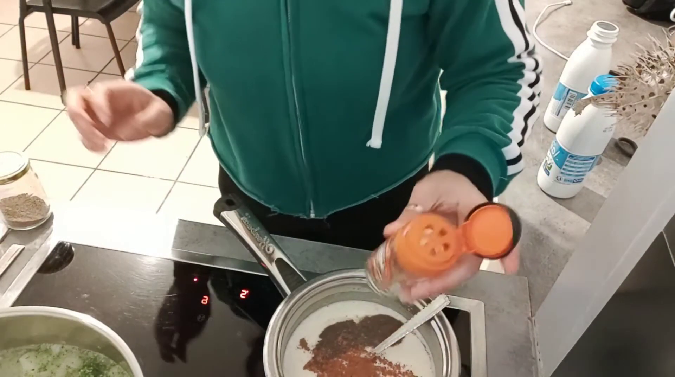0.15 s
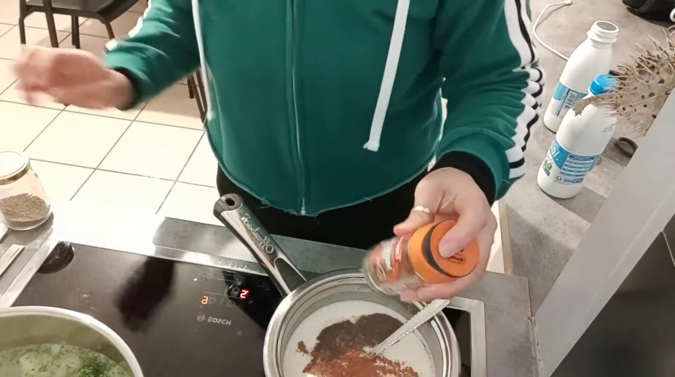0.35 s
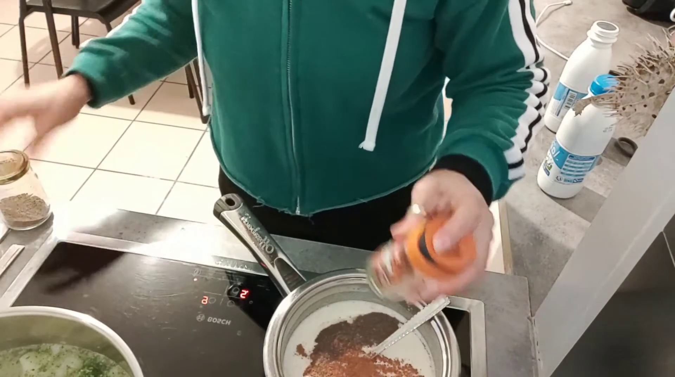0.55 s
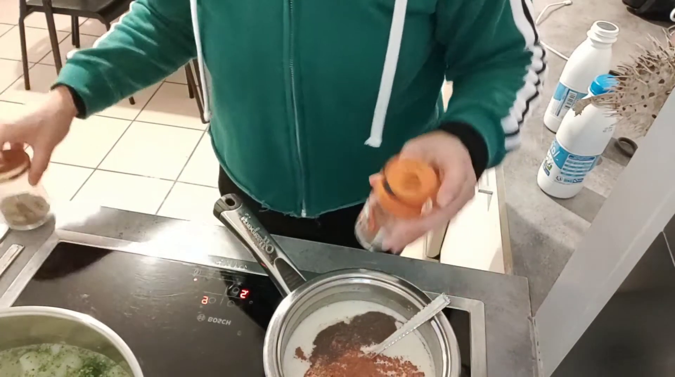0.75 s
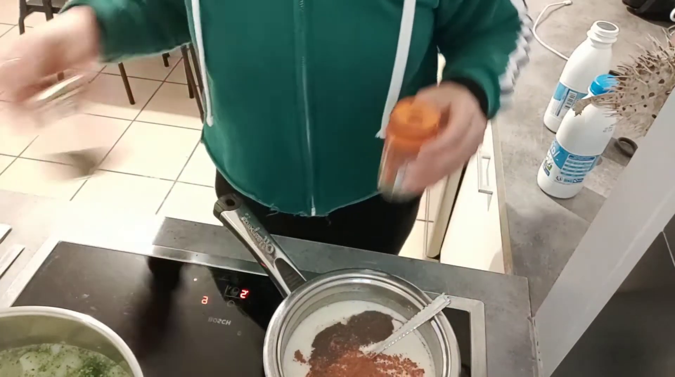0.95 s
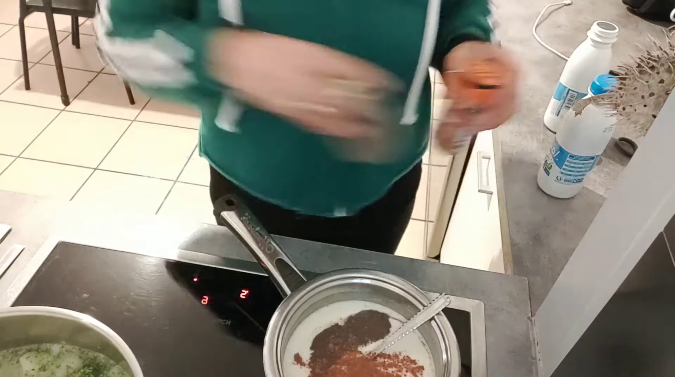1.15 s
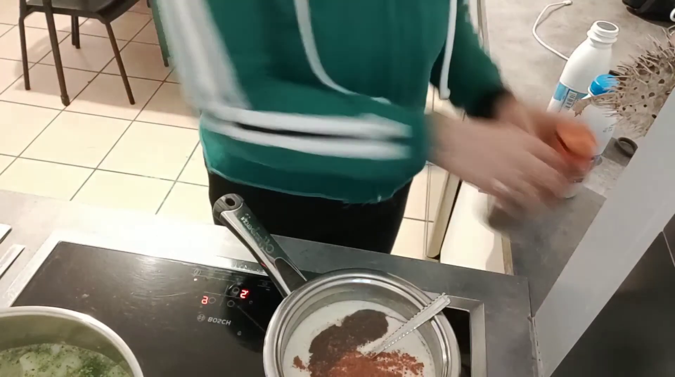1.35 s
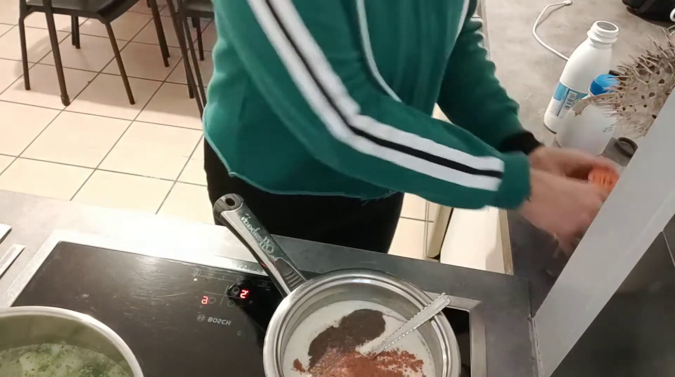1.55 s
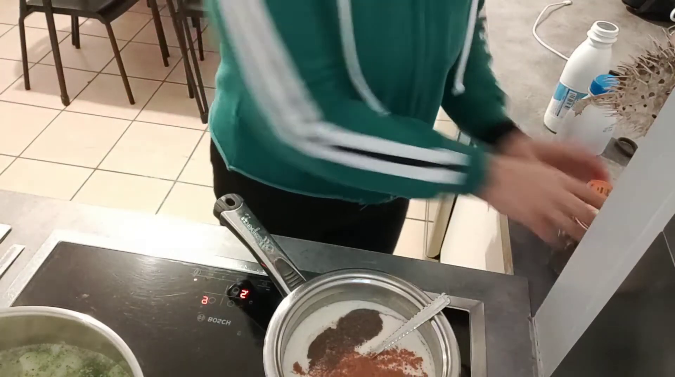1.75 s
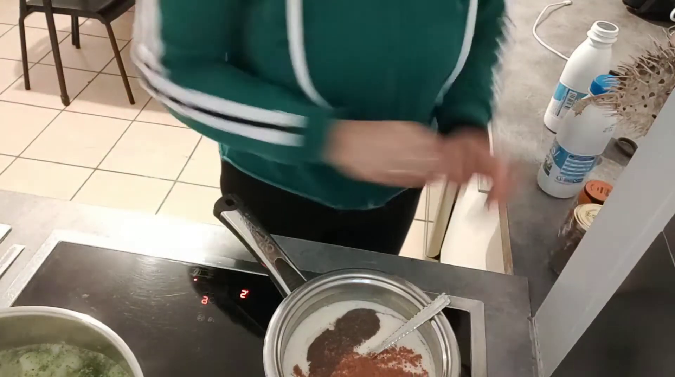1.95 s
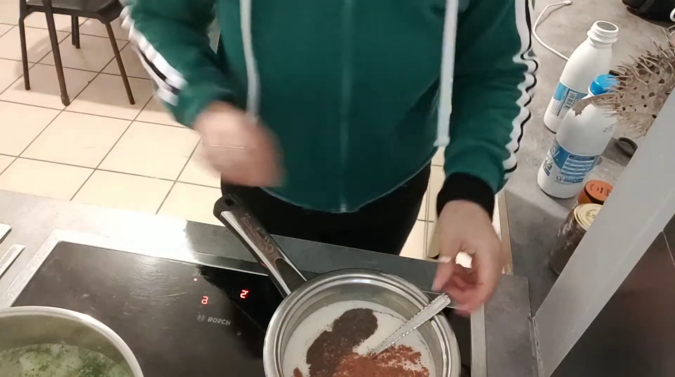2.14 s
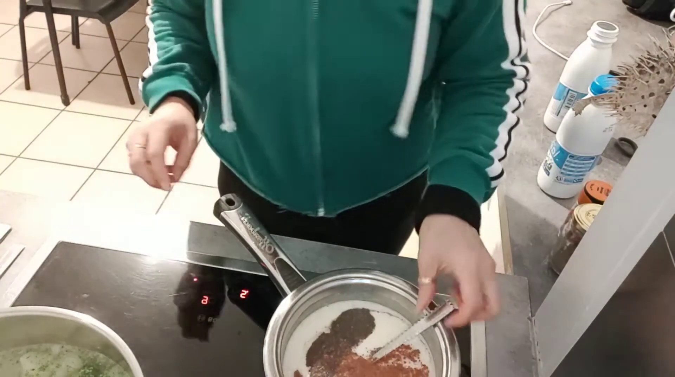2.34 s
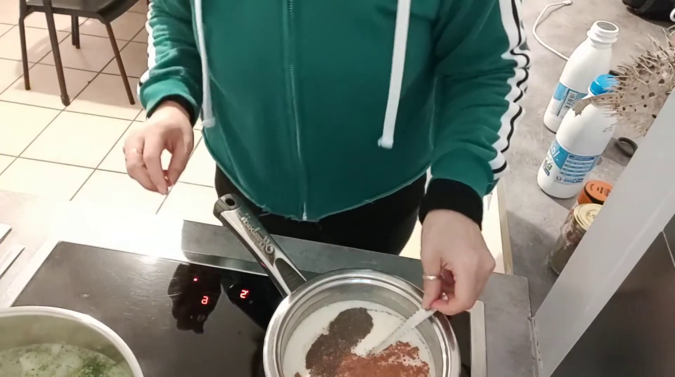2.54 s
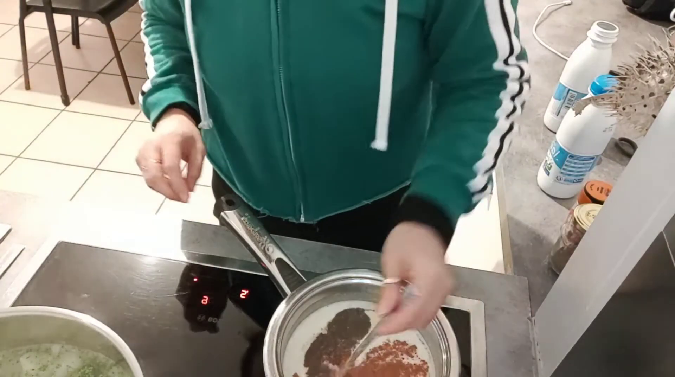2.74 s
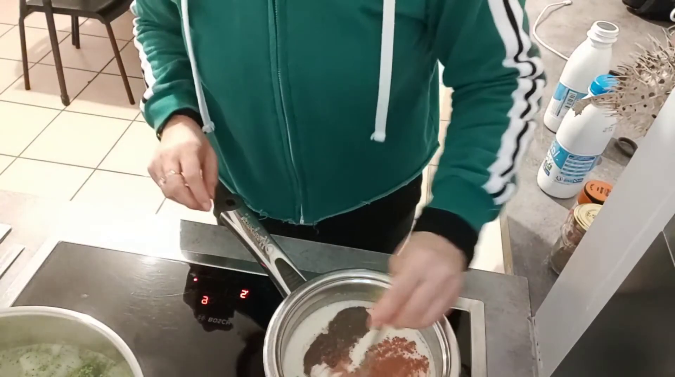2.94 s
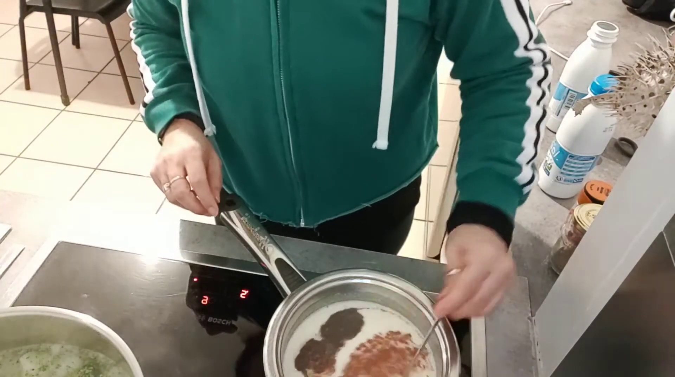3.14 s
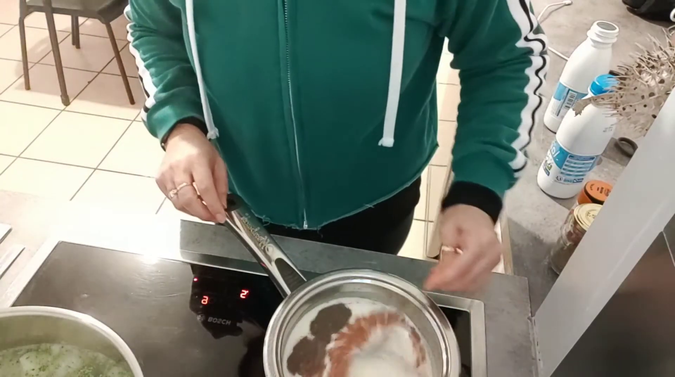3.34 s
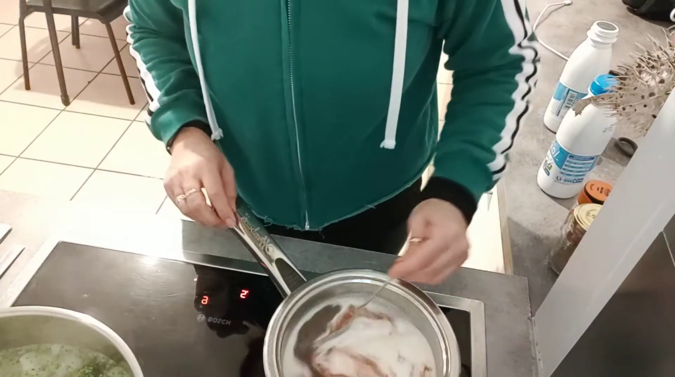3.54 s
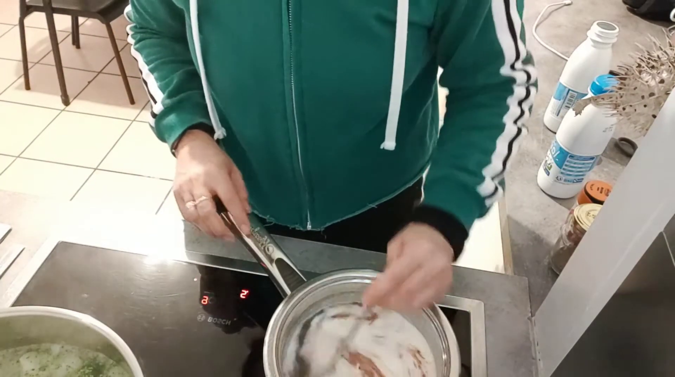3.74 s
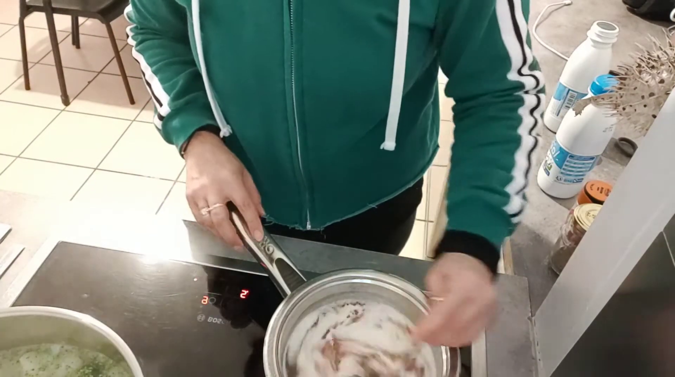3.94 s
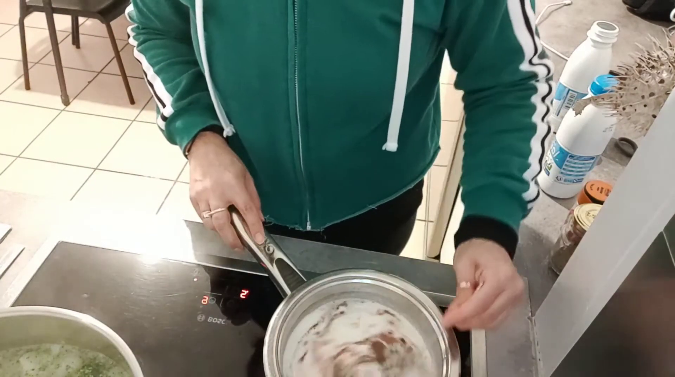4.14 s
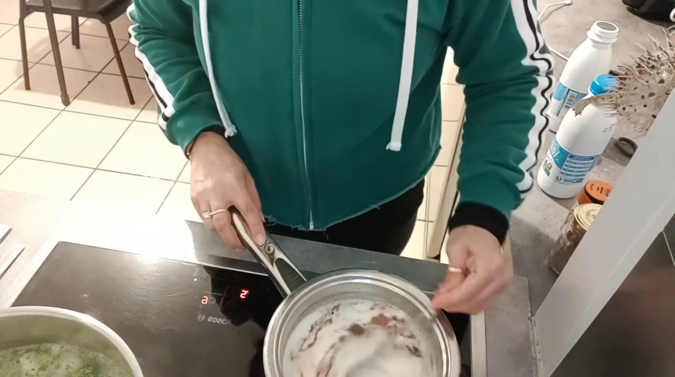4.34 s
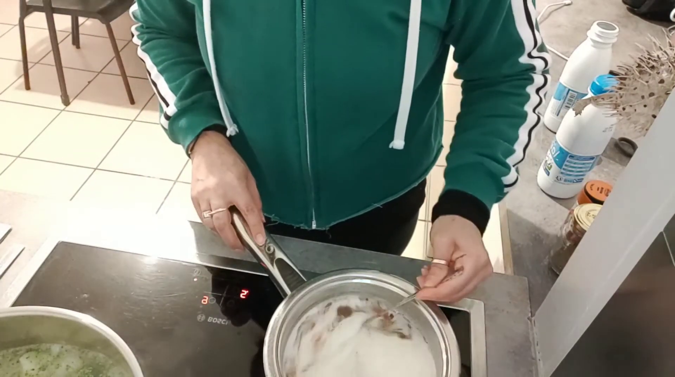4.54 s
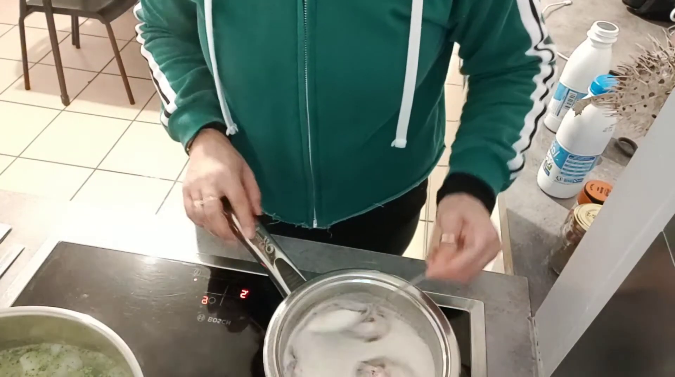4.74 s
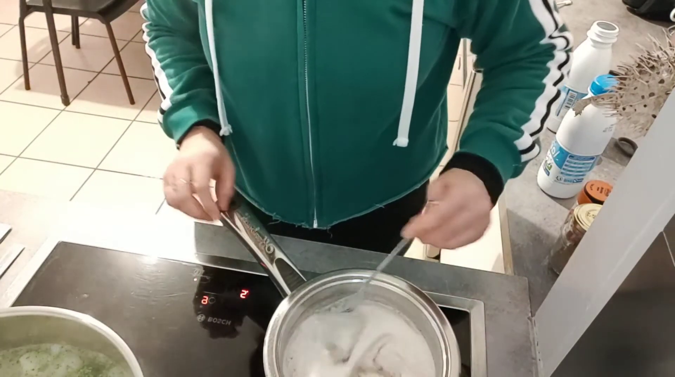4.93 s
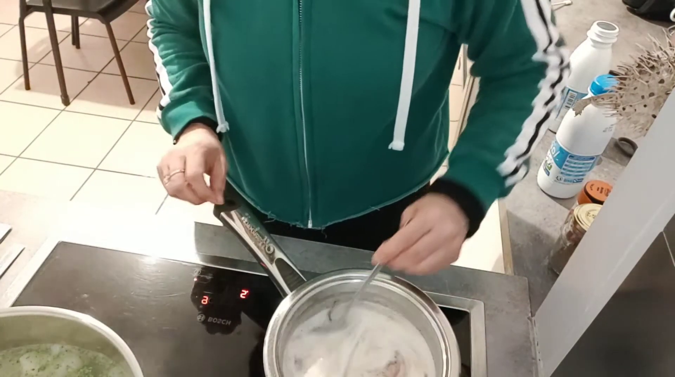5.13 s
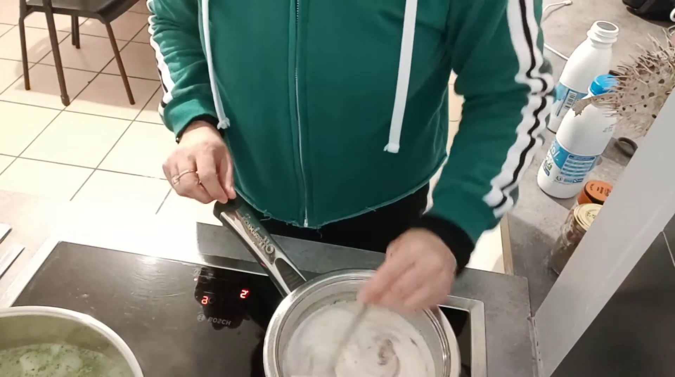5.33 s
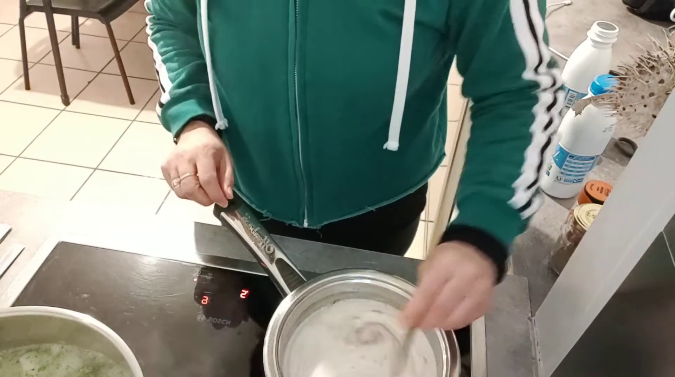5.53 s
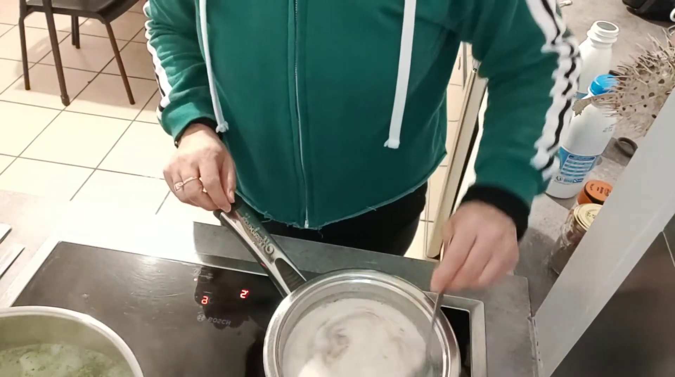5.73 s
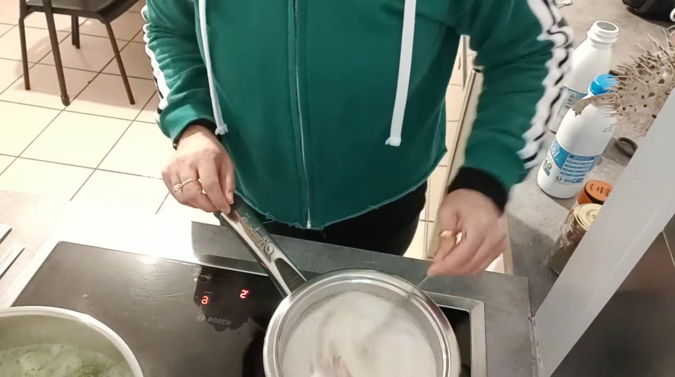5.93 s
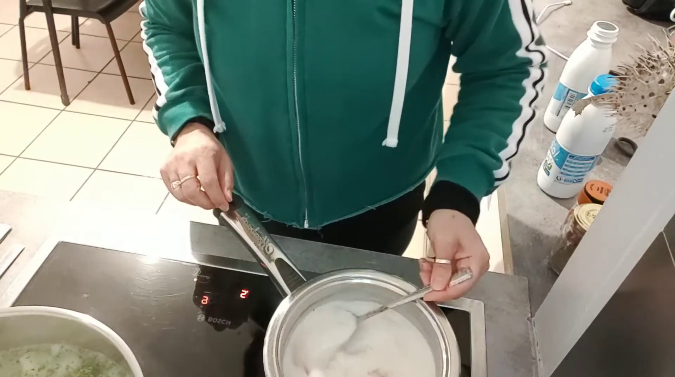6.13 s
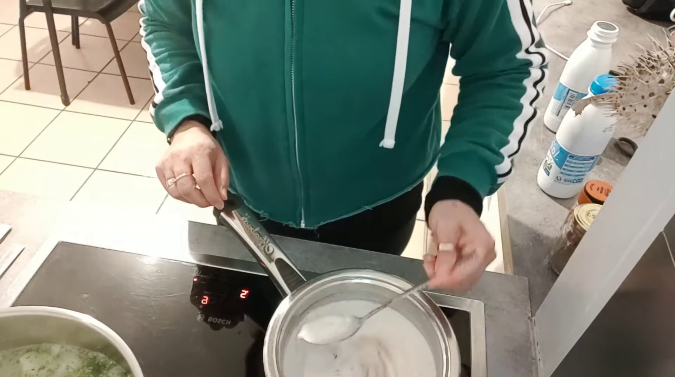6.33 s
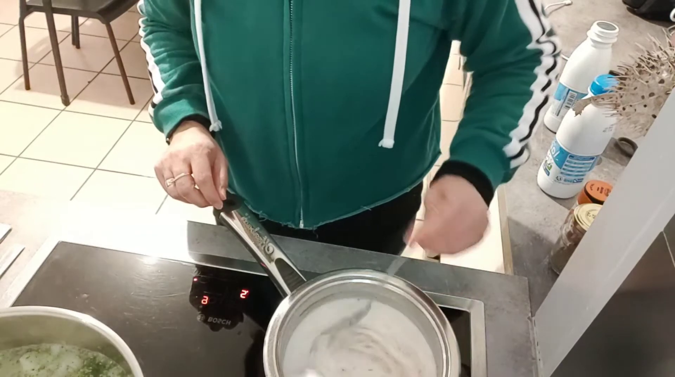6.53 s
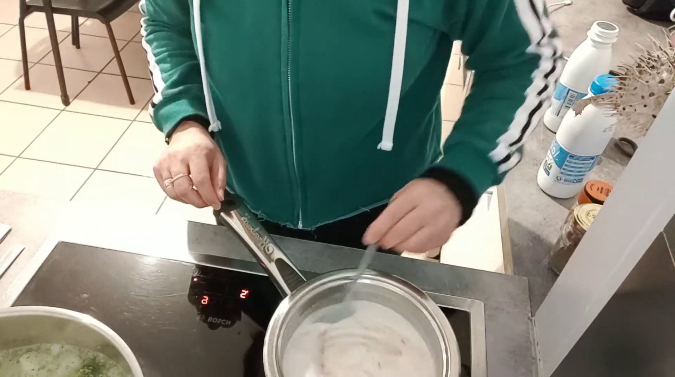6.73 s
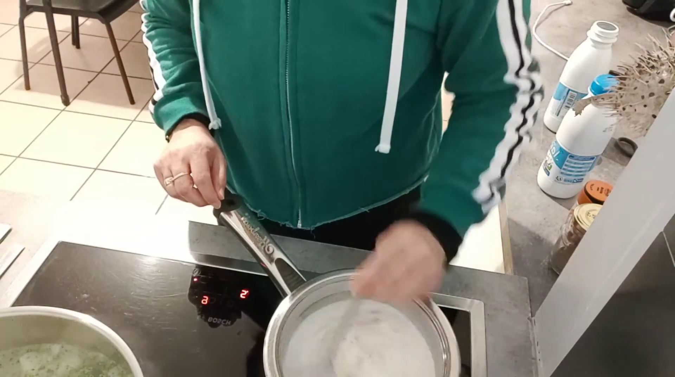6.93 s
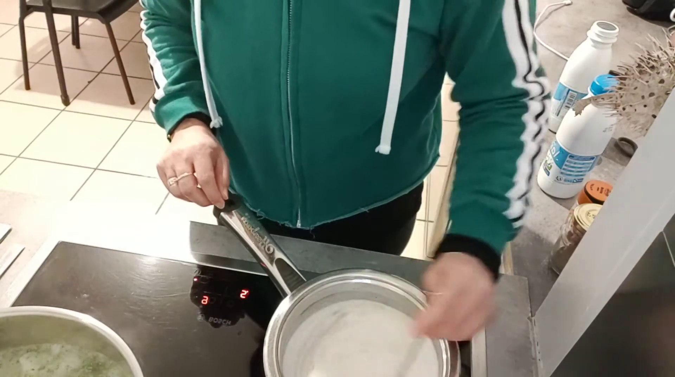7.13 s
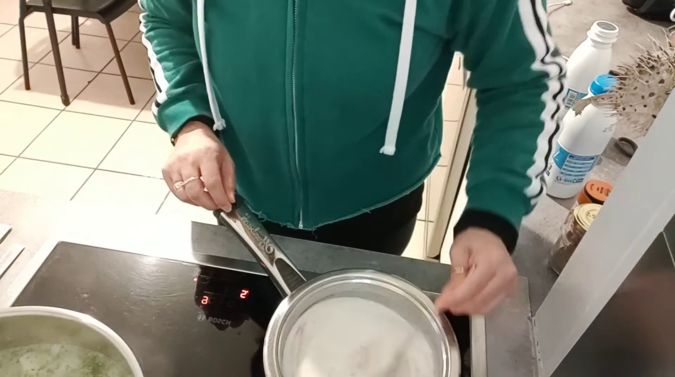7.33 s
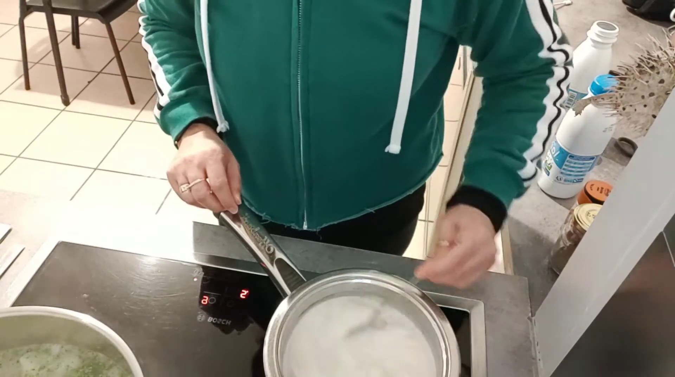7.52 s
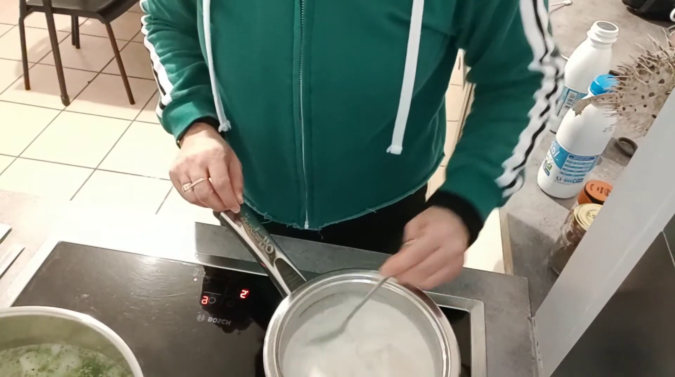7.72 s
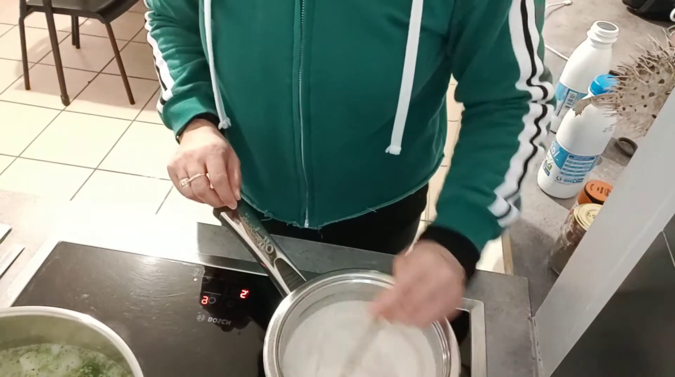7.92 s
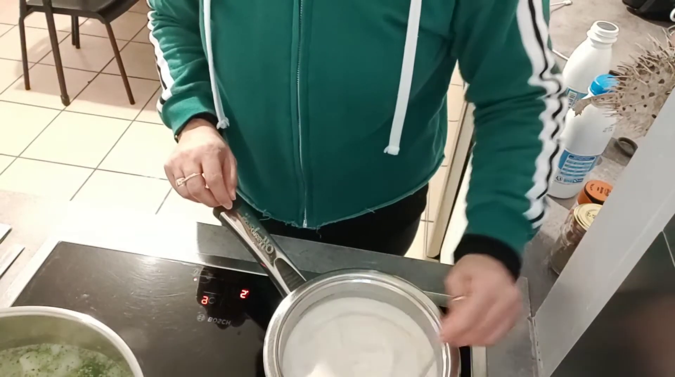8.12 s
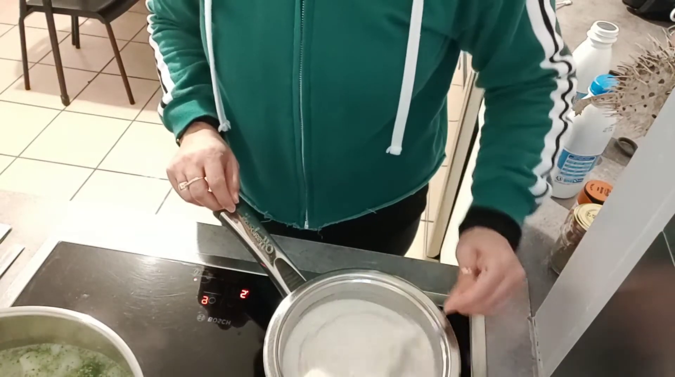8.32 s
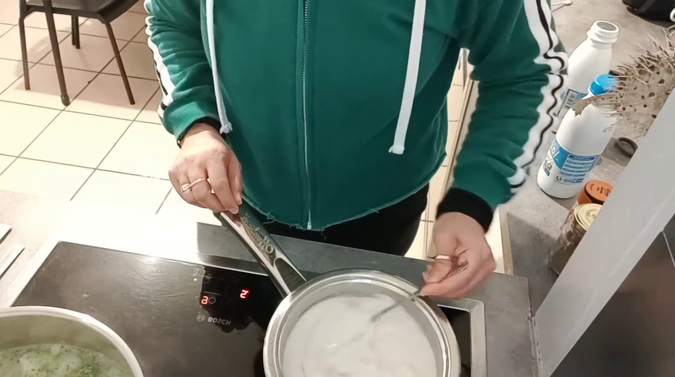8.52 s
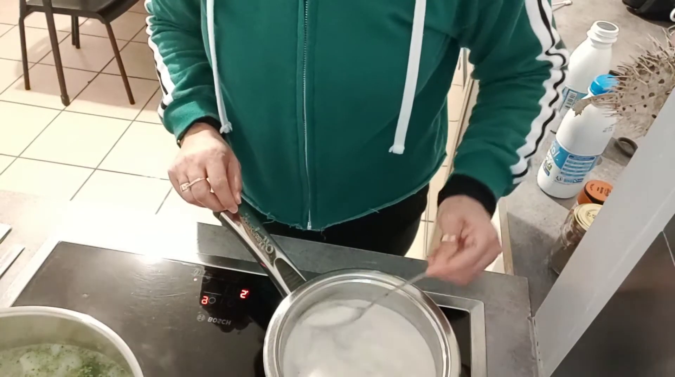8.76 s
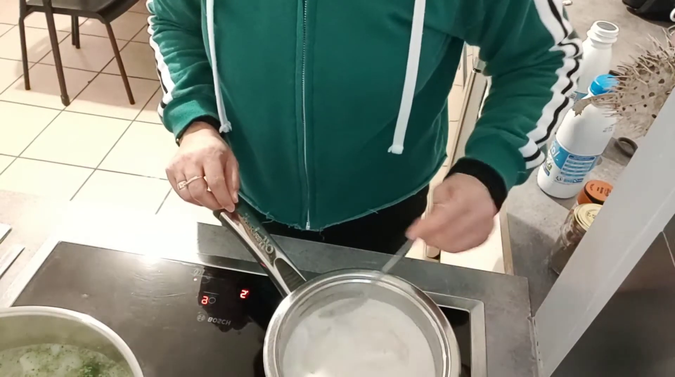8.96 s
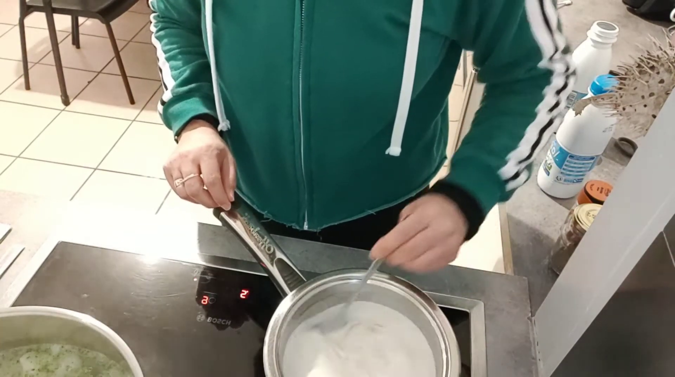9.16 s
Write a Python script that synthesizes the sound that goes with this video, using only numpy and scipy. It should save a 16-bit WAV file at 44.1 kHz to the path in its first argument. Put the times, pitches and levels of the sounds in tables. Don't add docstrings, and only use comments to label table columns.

```python
import sys
import numpy as np
from scipy import signal
from scipy.fft import rfft, irfft
from scipy.io import wavfile

SR = 44100
rng = np.random.default_rng(int(sys.argv[2]) if len(sys.argv) > 2 else 0)


def dump_mix(stems):
    frames = np.atleast_2d(stems).T
    limited = np.clip(frames, -1, 1)
    pcm = np.round(limited * 32767).astype(np.int16)
    wavfile.write(sys.argv[1], SR, pcm)


def volts(x):
    e = np.asarray(x, float) / 20
    return 10 ** e


N = 405279

# mode_hz, width_hz, level_db
PAN_MODES = [(684, 150, -17.5), (940, 11, -15.5), (1050, 19.7, -2.5), (1240, 37, -2), (1370, 21, -1),
             (1677, 11, -4), (1909, 71, 2.5), (2081, 46, -5.5), (2220, 30, -12), (2493, 27, -9.5),
             (2864, 37, -3.5), (3130, 81, -10), (3877, 52, -12)]
# start_s, peak_db, crack_db, hob_thud_db, favoured_hz
WALL_KNOCKS = [(2.898, -46.5, -11, -10, 1060), (3.8, -48, -0.5, -14, 1030), (4.096, -39, -15, -16, 692),
               (4.813, -62, -16, -18, 678), (5.125, -17, -5.5, -5.5, 2530), (5.349, -35, -7.5, -21, 1050),
               (5.709, -37.5, -18, 2.5, 1030), (5.92, -39, -6.5, -21, 1040), (5.969, -34.5, -12, -8, 2190),
               (6.25, -41, -29, 0, 681), (6.337, -51, -25, -12, 680), (6.736, -22.5, 1, 0, 1000),
               (6.972, -41, -10, -14, 1370), (7.915, -35, -18, -10, 1380), (8.106, -43.5, -5, -8, 720),
               (8.557, -53, 8, 8, 1370), (8.836, -47, -28, -1.5, 960), (9.158, -30.5, -2.5, 0, 1050)]
# freq_hz, density_db [dB per Hz]
CRACK_COLOUR = [(180, -57), (300, -34), (600, -28), (1000, -12), (1680, -3), (1950, -9.5), (2500, -2.5),
                (3200, -7), (4530, -20.5), (6970, -11.5), (8940, -11), (10600, -27.5), (15700, -36)]
# start_s, peak_db, thud_db, snap_db
LID_HITS = [
    (.334, -22.5, 1.5, -11.5),
    (0.373, -25, -6, 0.8),
    (0.39, -39.5, -8, 0),
]
# freq_hz, density_db [dB per Hz]
SNAP_COLOUR = [(240, -25), (400, -3), (862, 1), (1950, 1.5), (2640, -17), (3380, -10), (4670, -52),
               (5440, -17), (8490, -10.5), (11000, -33), (13100, -25), (15700, -38)]
# start_s, peak_db
JAR_TOUCHES = [
    (2.348, -26.5),
    (2.355, -28.5),
    (2.372, -36),
]
# freq_hz, density_db [dB per Hz]
JAR_COLOUR = [(88, -29), (150, -5.5), (769, -3), (1640, -30), (1810, -18.5), (2670, -15.5), (2890, -9),
              (3060, -15.5), (4790, -24.5), (6930, -18), (7640, -4), (14800, -35), (15700, -10)]
# freq_hz, density_db [dB per Hz]
AIR_COLOUR = [(1500, -20), (2500, 0), (3600, -2.5), (4500, -16), (5800, -2.5), (7200, 3), (8500, 4.5),
              (10000, -8.5), (12000, -33.5), (15700, -18)]


def rms_one(x):
    return x / np.sqrt(np.mean(x ** 2) + 1e-20)


def at_hz(points, hz):
    table_hz, values = np.transpose(points)
    return np.interp(np.log(np.maximum(hz, 1)), np.log(table_hz), values)


def noise(colour, size):
    # freq_hz, left_right_likeness [-1 to 1]
    likeness = [(30, .99), (200, .995), (340, .95), (470, .3), (700, .1), (1400, -.1), (4000, .05),
                (8000, -.3), (14000, .1)]
    hz = np.fft.rfftfreq(size, 1 / SR)
    alike = np.clip(at_hz(likeness, hz), -1, 1)
    mid, side = rfft(rng.standard_normal((2, size))) * volts(at_hz(colour, hz))
    mid = mid * np.sqrt(1 + alike)
    side = side * np.sqrt(1 - alike)
    return rms_one(irfft(np.array([mid + side, mid - side]), size))


def drift(rate_hz):
    r = np.exp(-80 * np.pi * rate_hz / SR)
    white = rng.standard_normal(N // 40 + 2002)
    slow = signal.lfilter([1], [1, -2 * r, r * r], white)[2000:]
    return np.interp(np.arange(N) / 40, np.arange(len(slow)), rms_one(slow))


def resonate(x, hz, width_hz):
    r, w = np.exp(-np.pi * width_hz / SR), 2 * np.pi * hz / SR
    return signal.lfilter([0, np.sin(w)], [1, -2 * r * np.cos(w), r * r], x + 1e-18)


def dying(t60_s, size=8192):
    return volts(-60 * np.arange(size) / SR / t60_s)


def thud(hz, t60_s):
    return np.sin(2 * np.pi * hz * np.arange(8192) / SR) * dying(t60_s)


def add(out, start_s, sound):
    i = round(start_s * SR)
    out[..., i:i + sound.shape[-1]] += sound[..., :N - i]


def swells(starts_s, lengths_s, levels_db):
    rise_share = 0.31
    out = np.zeros(N)
    for start_s, length_s, db in zip(starts_s, lengths_s, levels_db):
        progress = np.linspace(0, 1, round(length_s * SR))
        phase = np.interp(progress, [0, rise_share, 1], [0, np.pi / 2, np.pi])
        add(out, start_s, volts(db) * np.sin(phase) ** 2)
    return out


def favour(hz, favoured_hz, lift_db, spread):
    return volts(lift_db * np.exp(-(np.log(hz / favoured_hz) / spread) ** 2))


def patchy(x, swing_db, rate_hz):
    edges_hz = [600, 1200, 1700, 2300, 3000, 3800]
    out = signal.sosfilt(signal.butter(2, edges_hz[-1], "high", fs=SR, output="sos"), x)
    for band_hz in zip(edges_hz, edges_hz[1:]):
        band = signal.sosfilt(signal.butter(2, band_hz, "band", fs=SR, output="sos"), x)
        out = out + volts(swing_db * drift(rate_hz)) * band
    return out


def scrape():
    # start_s, length_s, pressure_db, bowl_over_edge_db, favoured_low_hz
    strokes = [(2.843, 0.25, -60, 5, 1000), (2.997, 0.27, -57.5, 8.5, 866), (3.163, 0.23, -41.5, -15, 1240),
               (3.31, 0.35, -45, -8.5, 940), (3.68, 0.43, -55.5, 1, 1050), (4.026, 0.22, -58.5, 8, 940),
               (4.129, 0.19, -50.5, -6, 1240), (4.26, 0.37, -51, 4.5, 996), (5.21, 0.63, -55.5, -8.5, 1240),
               (5.653, 0.12, -62, 16, 900), (5.723, 0.24, -52, -15, 1240), (5.904, 0.058, -53, 10, 995),
               (5.948, 0.11, -50, -13, 1010), (6.208, 0.096, -70, 17, 790), (6.938, 0.19, -52.5, -12, 1100),
               (7.028, 0.21, -57, -6, 940), (7.207, 0.25, -48, 6, 1240), (7.35, 0.35, -40, -2.5, 1060),
               (7.78, 0.15, -57.5, -4, 1190), (7.884, 0.16, -55.5, -3, 1370),
               (8.093, 0.22, -55.5, 2.5, 910), (8.209, 0.26, -43, 2, 1240), (8.384, 0.21, -49, -1, 940),
               (8.436, 0.26, -50, -6, 1044)]
    # freq_hz, density_db [dB per Hz]
    hiss_colour = [(710, -54), (1200, -6), (1490, -12.5), (2120, -3), (2720, -3.5), (3160, -10.5),
                   (4140, -9), (4560, -22), (7310, -12.5), (15700, -51)]
    starts_s, lengths_s, pressure_db, bowl_db, bowl_hz = np.transpose(strokes)
    t = np.arange(N) / SR
    resting = np.clip((t - 2.52) / .2, 0, 1)
    low = swells(starts_s, lengths_s, pressure_db + bowl_db) + resting * volts(-69 + 2.3 * drift(12.0))
    high = swells(starts_s, lengths_s, pressure_db) + resting * volts(-73 + 2.7 * drift(12.0))
    low_hz = np.interp(t, starts_s + lengths_s / 2, bowl_hz) * np.exp(0.014 * drift(5.4))
    high_hz = 2254 * np.exp(0.056 * drift(2.3))

    sizes = volts(4.2 * np.minimum(rng.exponential(1, N), 3)) * rng.choice([-1, 1], N)
    slips_per_s = 3000
    slips = rms_one((rng.random(N) < slips_per_s / SR) * sizes) * volts(0.6 * drift(18))
    body = 0
    for hz, width_hz, db in PAN_MODES:
        if hz < 1500:
            level, favoured_hz = low * volts(-3.5), low_hz
        else:
            level, favoured_hz = high * volts(-3), high_hz
        drive = slips * level * volts(db + 3.8 * drift(7.0))
        drive = drive * favour(hz, favoured_hz, lift_db=11.0, spread=0.059)
        body = body + resonate(drive, hz, 1.46 * width_hz) * np.sqrt(width_hz / SR) * volts(-0.98)

    hiss_level = volts(-54.5) * (high * volts(51)) ** 1.2
    flutter_db = 5.0 + 1.6 * drift(15) + 2.06 * drift(150) + 1.2 * drift(55)
    hiss = hiss_level * volts(flutter_db) * patchy(noise(hiss_colour, N), swing_db=3.0, rate_hz=20.0)
    return body, hiss


def squeaks():
    # start_s, length_s, pitch_hz, level_db
    catches = [(3.223, 0.048, 1900, -53), (3.418, 0.098, 2400, -53), (7.302, 0.052, 2940, -47),
               (7.384, 0.052, 3080, -39), (7.445, 0.074, 2140, -47), (7.472, 0.036, 4220, -49),
               (8.278, 0.068, 3000, -52), (8.487, 0.028, 3980, -50.5), (.68, 0.12, 380, -51.5),
               (.7, 0.11, 240, -56), (5.7, 0.062, 400, -52.5), (5.92, .12, 382, -51),
               (4.174, 0.12, 1260, -58), (4.388, 0.11, 1030, -53.5), (5.85, .09, 3520, -56),
               (6.237, 0.033, 696, -50), (6.329, 0.045, 610, -56), (6.493, 0.045, 690, -56.5),
               (7.32, 0.12, 1280, -50.5), (7.499, 0.14, 1160, -51.5), (8.097, 0.029, 2700, -54),
               (8.267, 0.11, 1240, -52)]
    out = np.zeros(N)
    for start_s, length_s, hz, db in catches:
        swell = np.hanning(round(length_s * SR))
        tone = resonate(rng.standard_normal(len(swell)), hz, width_hz=160)
        add(out, start_s, volts(db) * swell * rms_one(tone))
    return out


def knocks():
    out, click = np.zeros((2, N)), np.zeros(8192)
    click[[0, 70, 95]] = .2, 1, -.6
    for start_s, db, crack_db, thud_db, favoured_hz in WALL_KNOCKS:
        pan_db = 2.5 + 0.4039 * (-22 - db)
        contact = np.hanning(round(7.5 + 1.25 * max(-28.5 - db, 0)))
        swell = np.minimum(np.arange(8192) / (43 + 3.5 * len(contact)), 1) ** 2
        push = signal.lfilter(contact / contact.sum(), 1, click)
        strengths_db = rng.normal(0, 0.51, len(PAN_MODES))
        ring = 0
        for (hz, width_hz, level_db), strength_db in zip(PAN_MODES, strengths_db):
            lift = favour(hz, favoured_hz, lift_db=10.5, spread=0.065)
            ring = ring + volts(level_db + strength_db) * lift * resonate(push, hz, 1.27 * width_hz)
        crack = signal.lfilter(contact / np.sqrt(contact @ contact), 1, noise(CRACK_COLOUR, 8192))
        crack = volts(crack_db) * crack * swell * dying(0.043)
        hit = volts(-15.5) * ring + crack + volts(thud_db - 9.5) * thud(181.7, 0.083)
        add(out, start_s - .0012, volts(db) * hit * volts([[pan_db / 2], [-pan_db / 2]]))
    return out


def gurgles():
    # start_s, length_s, from_hz, to_hz, level_db
    bubbles = [(8.39, 0.048, 587, 1060, -40.5)]
    out = np.zeros(N)
    for start_s, length_s, from_hz, to_hz, db in bubbles:
        hz = np.linspace(from_hz, to_hz, round(length_s * SR))
        add(out, start_s, volts(db) * np.hanning(len(hz)) * np.sin(2 * np.pi * np.cumsum(hz) / SR))
    return out


def lid():
    out = np.zeros((2, N))
    for start_s, db, thud_db, snap_db in LID_HITS:
        hollow = thud(203, 0.035) + volts(-10) * thud(420, 0.011)
        snap = noise(SNAP_COLOUR, 8192) * dying(0.03)
        add(out, start_s, volts(db) * (volts(thud_db) * hollow + volts(snap_db) * snap))
    return out


def clink():
    # mode_hz, level_db, t60_s
    jar_modes = [(2869, -15.5, 0.099), (2905, -26.5, 0.11), (4660, -24.5, 0.04), (7682, -20.5, .12),
                 (8425, -21, 0.11), (9060, -16, 0.078), (10850, -28, 0.11), (14500, -30, .04)]
    out, t = np.zeros((2, N)), np.arange(8192) / SR
    for start_s, db in JAR_TOUCHES:
        ring = 0
        for hz, level_db, t60_s in jar_modes:
            phase = rng.uniform(0, 2 * np.pi, (2, 1))
            ring = ring + volts(level_db + 10.5) * np.sin(2 * np.pi * hz * t + phase) * dying(min(t60_s, .2))
        add(out, start_s, volts(db) * (ring + noise(JAR_COLOUR, 8192) * dying(0.091)))
    add(out, 6.062, volts(-39) * noise(AIR_COLOUR, 8192) * dying(0.024))
    return out


def rustle():
    # start_s, length_s, level_db
    brushes = [(0.552, 0.17, -75), (.68, 0.13, -75), (0.982, 0.1, -65), (1.05, .3, -59),
               (1.37, 0.12, -64.5)]
    # freq_hz, density_db [dB per Hz]
    rustle_colour = [(180, -49), (300, -2), (581, -10), (663, -30), (708, -6), (2070, -2.5), (4070, -16),
                     (4490, -55), (5050, -17), (6900, -7), (15500, -40)]
    return swells(*np.transpose(brushes)) * noise(rustle_colour, N) * volts(3.5 + 1.3 * drift(23))


def bang():
    # start_s, level_db
    arrivals = [(1.5952, -22.5), (1.601, -18.5), (1.626, -25.5), (1.639, -21), (1.651, -24), (1.678, -29.5)]
    # freq_hz, density_db [dB per Hz]
    bang_colour = [(24, -55), (40, -6), (131, -9), (313, -10.5), (362, -7.5), (461, -4), (520, -15.5),
                   (679, -4), (824, -15.5), (886, -2.5), (1100, -3.5), (2150, -16.5), (2500, -26.5),
                   (4380, -44.5), (8010, -37), (13000, -77)]
    out = echo(arrivals, bang_colour, gain_db=37, rise_s=0.0004)
    add(out, 1.5955, volts(-31.5) * noise(AIR_COLOUR, 8192) * dying(0.024))
    return out


def floor():
    # hum_hz, width_hz, level_db
    hum_modes = [(174, 20, -63.5), (362.3, 12, -63), (707, 13.5, -68.5)]
    # start_s, length_s, level_db
    treads = [(0, 0.38, -57), (1.58, 0.23, -57), (4.3, 0.29, -52), (6.656, 0.49, -55), (7.755, 0.88, -57)]
    # freq_hz, density_db [dB per Hz]
    rumble_colour = [(12, -33), (25, 1.5), (40, 9.5), (60, 8.5), (100, -6.5), (160, -38.5)]
    # freq_hz, density_db [dB per Hz]
    tone_colour = [(53, -22), (90, 0.5), (162, 0.5), (291, -8), (374, -10.5), (420, -8), (682, -10),
                   (875, -8.5), (3000, -24.5), (3900, -71), (6600, -120)]
    hum = 0
    for hz, width_hz, db in hum_modes:
        hum = hum + volts(db) * rms_one(resonate(rng.standard_normal(N), hz, width_hz))
    rumble_level = volts(-51.5 + 2.5 * drift(2.7)) + swells(*np.transpose(treads))
    rumble = rumble_level * noise(rumble_colour, N)
    room_tone = volts(-54 + .8 * drift(3.0)) * noise(tone_colour, N)
    return rumble + room_tone + volts(-66) * noise(AIR_COLOUR, N) + hum


def reverb(colour, rise_s):
    # freq_hz, t60_s
    room_t60 = [(60, 0.4), (300, 0.61), (1500, 0.83), (6000, 0.69), (14000, 0.46)]
    size = 2 ** 16
    whole, hz, out = rfft(noise(colour, size)), np.fft.rfftfreq(size, 1 / SR), 0
    for low_hz in 22 * 2. ** np.arange(10):
        octave = irfft(whole * (hz >= low_hz) * (hz < 2 * low_hz), size)
        out = out + octave * dying(at_hz(room_t60, low_hz * np.sqrt(2)), size)
    out = out * (1 - np.exp(-np.arange(size) / SR / rise_s))
    return rms_one(out) / np.sqrt(size)


def convolve(x, tail):
    return signal.fftconvolve(x[None], tail, axes=1)[:, :N]


def echo(hits, colour, gain_db, rise_s=0.0076):
    blows = np.zeros(N)
    for start_s, level_db, *_ in hits:
        blows[round(start_s * SR)] = volts(level_db + gain_db)
    return convolve(blows, reverb(colour, rise_s))


def scene():
    body, hiss = scrape()
    body = signal.sosfilt(signal.butter(2, 620, "high", fs=SR, output="sos"), body)
    room_feed = body + volts(-8) * squeaks()
    body = body + squeaks()
    direct = volts(-1) * np.array([body * volts(6.0), np.roll(body, 8) * volts(2.0)]) + gurgles()
    pan_hits = knocks()
    jar_hits = lid() + volts(2.5) * clink()

    kitchen = reverb([(40, 14), (1000, 2.5), (8000, 3.0), (15000, -9)], rise_s=0.0026)
    wet = volts(1.5) * room_feed + volts(-9.5) * pan_hits[0] + volts(-9) * jar_hits[0]
    tails = echo(WALL_KNOCKS, CRACK_COLOUR, gain_db=10)
    tails = tails + echo(LID_HITS[1:], SNAP_COLOUR, gain_db=-6)
    tails = tails + echo(JAR_TOUCHES, JAR_COLOUR, gain_db=20.5)
    near = direct + hiss + rustle() + pan_hits + jar_hits
    return near + convolve(wet, kitchen) + tails + bang() + floor()


def roll_off(x):
    return signal.sosfilt(signal.butter(12, 16650, fs=SR, output="sos"), x)


def record(dry):
    dipped = dry - .5 * signal.lfilter(*signal.iirpeak(4500, 6.0, fs=SR), dry)
    mix = signal.sosfilt(signal.cheby2(12, 60, 16300, fs=SR, output="sos"), dipped)
    return roll_off(mix)


dry = scene()
out = record(dry)
dump_mix(out)
```